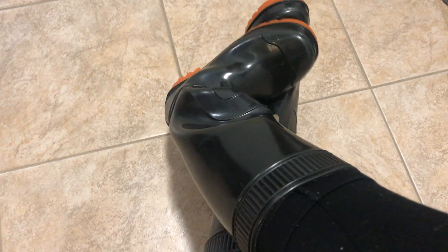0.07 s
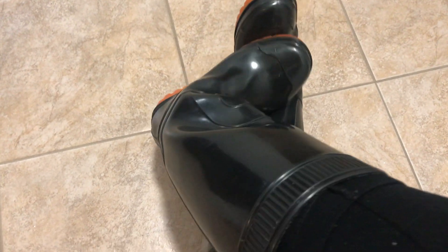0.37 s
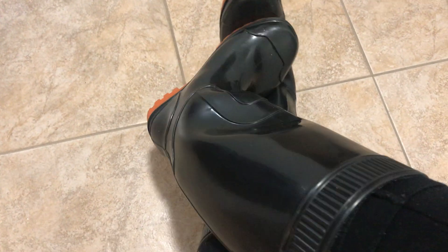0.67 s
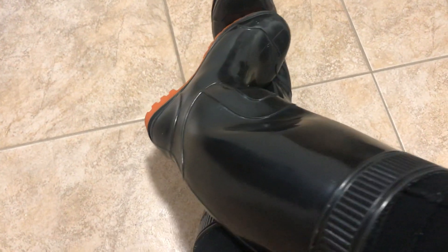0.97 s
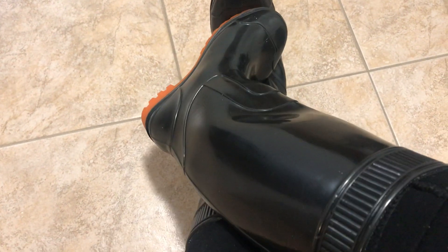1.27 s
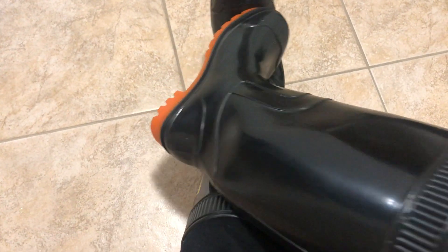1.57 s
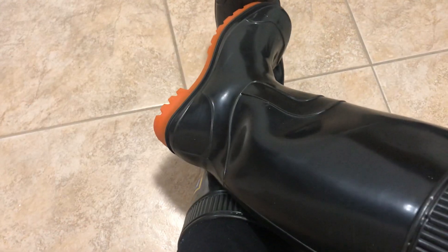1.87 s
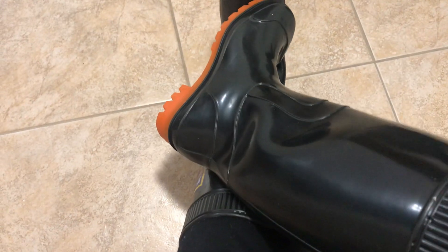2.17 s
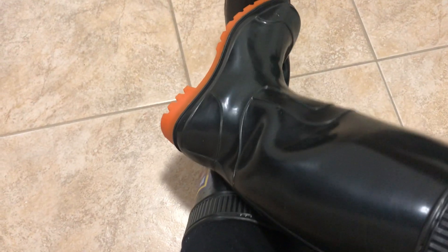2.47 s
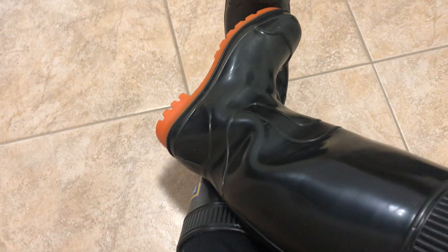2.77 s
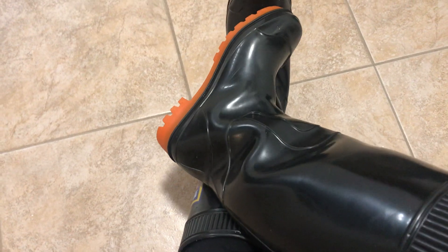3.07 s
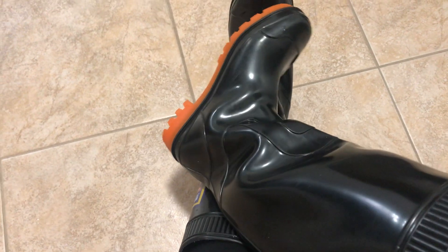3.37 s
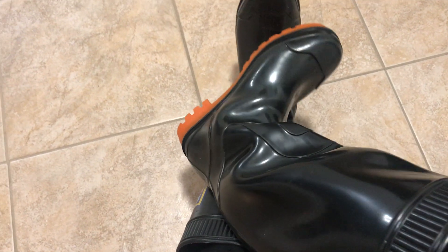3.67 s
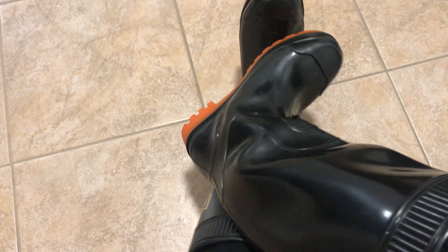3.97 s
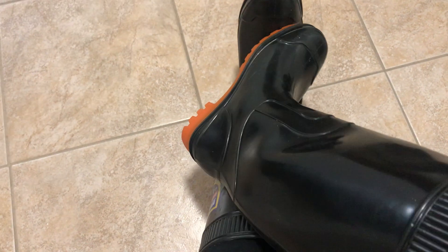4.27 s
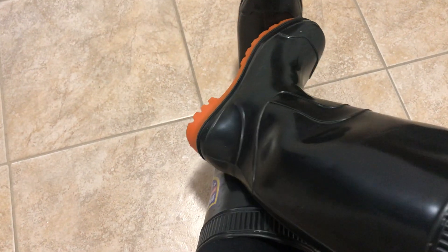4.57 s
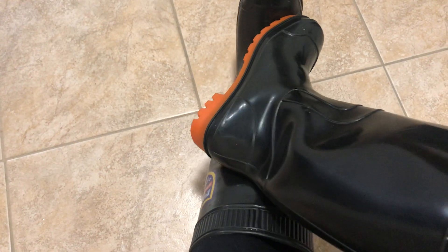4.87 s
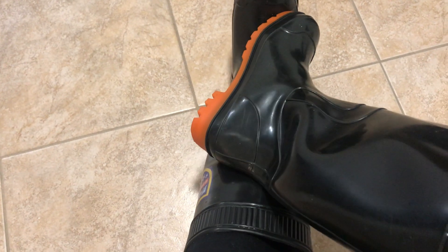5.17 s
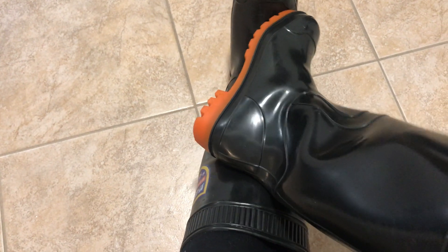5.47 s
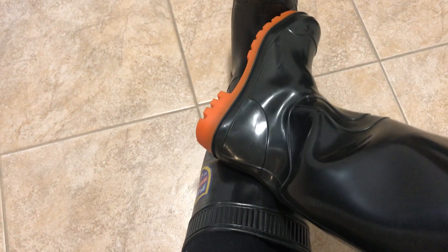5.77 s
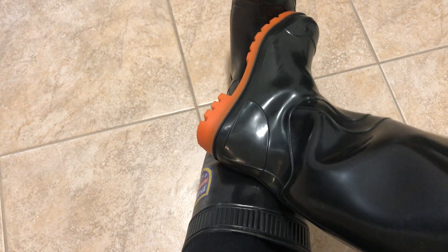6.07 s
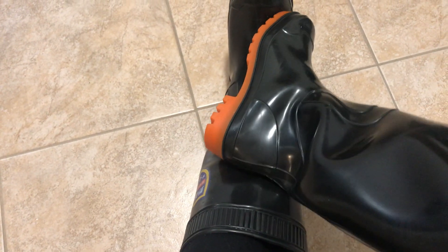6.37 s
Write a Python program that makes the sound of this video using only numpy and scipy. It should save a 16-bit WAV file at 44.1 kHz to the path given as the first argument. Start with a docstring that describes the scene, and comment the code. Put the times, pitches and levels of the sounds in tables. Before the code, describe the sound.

Rubber boots scrape together with a brief hissy creak, then snap and crackle as their folds buckle. One loud pop stands out early on. The rubber goes on sticking and slipping in quieter creaks before the snaps grow stronger, ending in a quick flurry. It is all heard through a single microphone in a small room with a tiled floor, with a short echo and faint steady room tone.

```python
"""A small room with a tiled floor, on one microphone, over a low murmur of air.
A tall rubber boot is flexed at the ankle and rubbed against its partner. The rubber sticks and slips
in creaks, and folds in the shaft buckle with sharp snaps. Each slip gives a crack at the surface,
a flap of the wall and a hollow thump of the shaft, and the room rings briefly behind it.
Once, the whole shaft pops back into shape with a bang."""
import sys
import numpy as np
from scipy import signal
from scipy.fft import rfft, irfft, next_fast_len
from scipy.io import wavfile

SR = 44100
rng = np.random.default_rng(int(sys.argv[2]) if len(sys.argv) > 2 else 0)


def wav_out(sig):
    """Save sig, one row per channel (or a flat mono array), as 16-bit PCM at SR to the path in sys.argv[1]."""
    wavfile.write(sys.argv[1], SR, np.round(np.clip(np.atleast_2d(sig).T, -1, 1) * 32767).astype(np.int16))


N = 292383
TIME = np.arange(N) / SR
AGE = np.arange(SR // 10) / SR   # seconds since a slip

# Folds letting go. Each row: time in seconds, crack, flap and thump in relative dB, crack cutoff in Hz.
FOLD_SNAPS = [(0.03, -54, -43, -44, 6500), (0.1704, -37.5, -36, -33, 4800), (0.3075, -53.5, -70, -65, 6500),
              (0.4035, -58.5, -51, -50, 6040), (0.8167, -45.5, -46.5, -54.5, 3400),
              (0.918, -44, -46.5, -39, 4540), (1.049, -56.5, -54, -54.5, 6000),
              (1.2334, -54.5, -52, -50, 6300), (1.412, -31.5, -36, -42, 4070),
              (1.633, -51.5, -46, -49, 3400), (1.914, -58, -53.5, -57.5, 4000),
              (2.1775, -50, -47.5, -51.5, 6160), (2.435, -46, -45.5, -41.5, 4150),
              (2.4911, -47.5, -42.5, -44.5, 6300), (2.5176, -48, -45.5, -49.5, 6100),
              (2.6014, -50.5, -45.5, -54, 6130), (2.6154, -50, -61, -43, 6300),
              (3.261, -55.5, -60, -62, 4200), (3.329, -59, -53, -65.5, 3300), (3.39, -50, -57, -63, 4200),
              (3.4806, -54.5, -52, -63, 3500), (3.9581, -61, -62, -65, 8800),
              (4.163, -55.5, -65, -68, 7200), (4.252, -57, -46.5, -50.5, 4400),
              (4.3854, -45.5, -41, -38, 4100), (4.506, -44.5, -38.5, -34.5, 4000),
              (4.5442, -42, -38.5, -41, 3260), (4.802, -41, -36.5, -36, 3760),
              (4.9487, -57, -50, -57, 4430), (5.0576, -51.5, -46.5, -52, 4700),
              (5.1019, -43, -35.5, -34.5, 5570), (5.2335, -57, -51, -53, 5300),
              (5.3628, -41.5, -35.5, -34.5, 5240), (6.069, -60, -62, -65, 10100),
              (6.1036, -46, -44, -49.5, 5730), (6.1784, -38.5, -36.5, -33, 6400),
              (6.2768, -39.5, -36.5, -36, 6900), (6.3433, -41.5, -38, -32, 7240),
              (6.3598, -47, -39, -46, 4950), (6.3804, -45.5, -41, -41, 7600),
              (6.556, -47.5, -58, -62, 5500), (6.577, -35.5, -29.5, -35, 5340)]
# Rubbing strokes. Each row: start, hardest push and end in seconds, slips per second at that push,
# unevenness of pace from 0 to 1, crack, flap and thump in relative dB, crack cutoff in Hz.
RUB_STROKES = [(0, 0.001, 0.082, 770, .6, -43, -46.5, -47.5, 6500),
               (0.423, 0.461, .69, 256, .7, -51.5, -52, -48.5, 6500),
               (0.696, 0.769, .91, 95, 0.71, -56, -57, -54.5, 6040),
               (0.918, .94, 0.96, 250, .6, -50, -44, -47.5, 5900),
               (1.561, 1.62, 1.857, 100.5, 0.61, -58, -58.5, -56.5, 5800),
               (2.665, 2.69, 2.762, 178, 0.41, -51, -52.5, -46, 5870),
               (2.891, 2.992, 3.18, 90, 0.19, -62.5, -58.5, -52, 4300),
               (3.17, 3.419, 3.6, 78, 0.84, -57, -61, -64.5, 3460),
               (3.679, 3.776, 3.96, 130, 0.58, -56.5, -56, -59.5, 6300),
               (4.16, 4.27, 4.37, 160, 0.68, -60, -61, -61, 6000),
               (4.55, 4.575, 4.57, 225, .3, -47, -40.5, -43, 4600),
               (4.631, 4.772, 4.84, 69, 0.59, -57.5, -54, -56.5, 5360),
               (5.487, 5.501, 5.53, 230, .7, -58.5, -63, -69, 5500),
               (5.81, 5.89, 5.92, 116, 0.52, -50, -53, -48.5, 5540),
               (6.535, 6.541, 6.572, 127, .6, -66, -47.5, -52, 5400)]
# Modes of the hollow shaft. Each row: frequency in Hz, relative level in dB, t60 in seconds.
SHAFT_MODES = [(84.4, -6.5, 0.13), (118, -2.5, 0.042), (191.4, -2, 0.043), (273.7, -1.5, 0.051),
               (367, -1.5, 0.013), (588, -19.5, 0.16), (925, -14.5, .045)]
# Spectra of a surface crack, free sliding, the shuddering wall and the room's air.
# Each row: frequency in Hz, relative spectral density in dB.
CRACK_SPECTRUM = [(600, -23), (1200, 2), (2300, -0.5), (4200, -1.5), (6500, -4.5), (8000, -3), (10300, -4),
                  (12000, 2.5), (16000, -0.5)]
SLIDE_SPECTRUM = [(3000, -15), (5700, -19), (6400, 10), (8300, 1), (10000, -22), (16000, -16)]
SHUDDER_SPECTRUM = [(80, 4), (350, 5), (1500, -2.5), (2400, -1), (6800, -3), (8000, -28)]
AIR_SPECTRUM = [(25, -13), (45, 2.5), (85, -2), (140, -5), (245, -11.5), (295, 1.5), (370, -16.5),
                (900, -13.5), (2000, -25.5), (4000, -31.5), (9000, -38.5)]
# How long the room rings. Each row: frequency in Hz, t60 in seconds.
RING_T60 = [(100, 0.5), (300, 0.54), (4000, 0.57), (14000, 0.41)]
# How much room reaches the microphone. Each row: frequency in Hz, level in dB against the direct sound.
RING_DB = [(80, -8.5), (280, -6), (600, -6.5), (1300, -4), (4000, -6), (14000, -7)]

FLAP_HZ, FLAP_FALL = 701, 0.91   # centre pitch of a flap; octaves it glides on either side of its centre
LIGHT_DB, HEAVY_DB = -47, -32   # thump levels that mark a fold as light or heavy
WARNING_S, WARNING_DB = .012, -11   # a small slip just before a fold gives way
SETTLING_S, SETTLING_DB = .017, -12.5   # and another as it settles
# A sticking patch judders free in four even, light snaps; levels are for crack, flap and thump.
JUDDER_S, JUDDER_GAP_S, JUDDER_DB, JUDDER_CUTOFF_HZ = .0732, .0243, (-49.5, -40, -46.5), 6100


def from_db(db):
    """Decibels to gain."""
    return 10 ** (np.asarray(db) / 20)


def unit(x):
    """Scale to an energy of one."""
    return x / np.sqrt(np.sum(x ** 2) + 1e-20)


def at_hz(points, hz):
    """Read a table on a log-frequency axis."""
    f, value = np.transpose(points)
    return np.interp(np.log(hz + 1e-6), np.log(f), value)


def add(out, s, sound):
    """Mix a sound in at s seconds."""
    i = max(0, int(s * SR))
    out[i:i + len(sound)] += sound[:max(0, N - i)]


def filtered(x, kind, hz, order=2):
    """Butterworth low-, high- or band-pass."""
    return signal.sosfilt(signal.butter(order, hz, kind, fs=SR, output="sos"), x)


def colour(x, spectrum):
    """Causal (minimum-phase) filter with the given spectrum."""
    size = 2 * next_fast_len(len(x))
    hz = np.arange(size // 2 + 1) * SR / size
    cepstrum = irfft(np.log(from_db(at_hz(spectrum, hz))))
    cepstrum[1:size // 2] *= 2
    cepstrum[size // 2 + 1:] = 0
    return irfft(rfft(x, size) * np.exp(rfft(cepstrum)), size)[:len(x)]


def steady_noise(spectrum):
    """Coloured noise with an RMS of one."""
    return np.sqrt(N) * unit(colour(rng.standard_normal(N), spectrum))


def air(level_db):
    """Room tone: the steady low murmur of the air."""
    return from_db(level_db) * steady_noise(AIR_SPECTRUM)


def room_response(floor_lag_s, floor_db, near_db, near_t60):
    """An echo off the tiles, quick ones off legs and near walls, then a ring, shorter in the treble."""
    t = TIME[:SR * 3 // 4]
    edges = np.geomspace(50, 18000, 13)
    response = np.zeros(len(t))
    for low, high in zip(edges, edges[1:]):
        hz = np.sqrt(low * high)
        band = filtered(rng.standard_normal(len(t)), "band", [low, high])
        decay = from_db(-60 * t / at_hz(RING_T60, hz)) + from_db(near_db - 60 * t / near_t60)
        tail = unit(band * decay * (1 - np.exp(-t / floor_lag_s)))
        response += tail * from_db(at_hz(RING_DB, hz)) * np.sqrt(2 * (high - low) / SR)
    response[int(floor_lag_s * SR)] += from_db(floor_db)
    return response


def room(direct):
    """The moving boot reaches the microphone directly and by ever changing paths through the room."""
    heard = direct.copy()
    for share in np.cos(2 * np.pi * TIME), np.sin(2 * np.pi * TIME):
        response = room_response(floor_lag_s=.0042, floor_db=-20.5, near_db=3.5, near_t60=0.084)
        heard += signal.fftconvolve(share * direct, response)[:N]
    return heard


def bump(s, level_db, hz, width_s):
    """A soft, deep bump as the leg shifts."""
    return from_db(level_db) * np.exp(-((TIME - s) / width_s) ** 2) * np.sin(2 * np.pi * hz * TIME)


def slide(level_db, end_s, fade_s):
    """In the first, fastest stroke the rubber slides freely and hisses."""
    return from_db(level_db) * steady_noise(SLIDE_SPECTRUM) * np.clip((end_s - TIME) / fade_s, 0, 1)


def shudder(s, bang_db, body_db, body_t60, body_cutoff_hz, treble_db, treble_t60):
    """The shaft pops back into shape with one sharp bang, and all of its wall shudders."""
    t = TIME[:SR // 2]
    body, treble = rng.standard_normal((2, len(t)))
    body = filtered(body, "low", body_cutoff_hz)
    # rubber soaks up the treble sooner than the bass
    push = from_db(body_db) * unit(body * from_db(-60 * t / body_t60))
    push += from_db(treble_db) * unit(treble * from_db(-60 * t / treble_t60))
    push[0] -= from_db(bang_db)
    out = np.zeros(N)
    add(out, s, colour(push, SHUDDER_SPECTRUM))
    return out


def thump(stretch):
    """The shaft's modes: the rubber's bend shifts their pitch, the place of the slip their strengths."""
    hz, db, t60 = np.transpose(SHAFT_MODES)[:, :, None]
    bend, place = rng.uniform(-1, 1, (2, len(SHAFT_MODES), 1))
    gain = from_db(db + 2 * place - 60 * AGE / t60)
    modes = np.sum(gain * np.sin(2 * np.pi * hz * (1 + stretch * bend) * AGE), axis=0)
    return unit(filtered(modes, "high", hz.min()))   # little radiates below the lowest mode


def flap(hz, cycles):
    """The limp wall swings for a few cycles, falling in pitch as the fold opens."""
    hz = hz * 2 ** (rng.uniform(-1, 1) / 3)
    progress = AGE * hz / cycles
    pitch = hz * 2 ** (FLAP_FALL * (2 * np.exp(-progress) - 1))
    swing = np.sin(2 * np.pi * (np.cumsum(pitch) / SR + rng.random()))
    return unit(np.sqrt(progress) * np.exp(-2 * progress) * swing)


def crack(cutoff_hz, spread_s, crumble_db, crumble_t60):
    """One release, spread out as bending waves bring the highs first, then a crumble of tiny slips."""
    hz = np.arange(len(AGE) // 2 + 1) * SR / len(AGE)
    lag = spread_s * rng.uniform(0.533, 1) * np.sqrt(FLAP_HZ / (hz + FLAP_HZ))
    release = irfft(np.exp(-2j * np.pi * np.cumsum(lag) * hz[1]), len(AGE))
    grains, sizes = rng.standard_normal((2, len(AGE)))
    crumble = unit(grains * from_db(5.5 * sizes - 60 * AGE / crumble_t60))
    surface = colour(release + from_db(crumble_db) * crumble, CRACK_SPECTRUM)
    return unit(filtered(surface, "low", cutoff_hz))


def creaks(crack_db, flap_db, thump_db, flap_hz, uneven_db, thump_band_hz):
    """Rubber on rubber: tension builds and slips at an uneven pace, each slip a small snap."""
    flaps = [flap(flap_hz, cycles=1.41) for _ in range(24)]
    thumps = [thump(stretch=0.048) for _ in flaps]
    surface, hollow = np.zeros((2, N))
    for start, push, end, pace, jitter, *levels, cutoff_hz in RUB_STROKES:
        cracks = [crack(cutoff_hz, spread_s=0.00172, crumble_db=6, crumble_t60=0.035) for _ in range(12)]
        s = start
        for wait, force, place in rng.uniform(-1, 1, (200, 3)):
            if s > end:
                break
            # effort swells to the hardest push, then eases; the slips come faster with effort
            effort_db = np.interp(s, [start, push, end], [-5, 0, -7])
            period = 1 / (pace * from_db(.5 * effort_db))
            # a longer stick stores more energy
            strength = np.sqrt(period * SR) * from_db(effort_db + uneven_db * force)
            crack_gain, flap_gain, thump_gain = strength * from_db(levels)
            k = int(abs(place) * len(flaps))
            add(surface, s, crack_gain * from_db(crack_db) * cracks[k % len(cracks)])
            add(surface, s, flap_gain * from_db(flap_db) * flaps[k])
            add(hollow, s, thump_gain * from_db(thump_db) * thumps[k])
            s += period * np.exp(jitter * wait)
    return surface + filtered(hollow, "band", thump_band_hz)   # small slips stir only the middle modes


def snaps(crack_db, flap_db, thump_db, wall_db, wall_hz, wall_t60, peel_db, peel_t60, lead_s, lag_s):
    """A fold peels with a swelling crackle, buckles with a crack, and shakes the wall and the shaft."""
    out = np.zeros(N)
    judder = [(JUDDER_S + k * JUDDER_GAP_S, *JUDDER_DB, JUDDER_CUTOFF_HZ) for k in range(4)]
    wall_ring = unit(np.sin(2 * np.pi * wall_hz * AGE) * from_db(-60 * AGE / wall_t60))
    for s, crack_level, flap_level, thump_level, cutoff_hz in FOLD_SNAPS + judder:
        crack_gain, flap_gain = from_db(crack_level + crack_db), from_db(flap_level + flap_db)
        # a large fold thumps more and flaps lower
        flap_hz = FLAP_HZ * 2 ** np.clip((flap_level - thump_level) / 25, -.3, .5)
        buckle = crack(cutoff_hz, spread_s=0.00197, crumble_db=-1.5, crumble_t60=0.026)
        add(out, s - lead_s, crack_gain * buckle + flap_gain * flap(flap_hz, cycles=2.03))
        # the heavier the fold, the more the taut wall rings and the deeper the modes it stirs
        weight = np.interp(thump_level, [LIGHT_DB, HEAVY_DB], [0, 1])
        add(out, s, weight * from_db(flap_level + wall_db) * wall_ring)
        low_cut_hz = np.interp(weight, [0, 1], [185, 69])
        hollow = unit(filtered(thump(stretch=0.076), "high", low_cut_hz))
        add(out, s + lag_s, -from_db(thump_level + thump_db) * hollow)
        # light folds peel and slip more quietly
        slip_db = -7 * (1 - weight)
        peel = crack(cutoff_hz, spread_s=0, crumble_db=27, crumble_t60=peel_t60)[:SR // 50][::-1]
        add(out, s - len(peel) / SR, from_db(crack_level + peel_db + slip_db) * peel)
        early, late = rng.uniform(.7, 1.3, 2)
        for at, db in (s - early * WARNING_S, WARNING_DB), (s + late * SETTLING_S, SETTLING_DB):
            scuff = crack_gain * crack(cutoff_hz, spread_s=0.00167, crumble_db=1, crumble_t60=0.04)
            scuff += flap_gain * flap(flap_hz, cycles=3.06)
            add(out, at, from_db(db + slip_db) * scuff)
    return out


def scene():
    """The boot's snaps and creaks in the tiled room, as they arrive at the microphone."""
    boot = snaps(crack_db=26.5, flap_db=25, thump_db=26.5, wall_db=25, wall_hz=620, wall_t60=0.072,
                 peel_db=19, peel_t60=0.034, lead_s=.0005, lag_s=.0012)
    boot += creaks(crack_db=-2, flap_db=-.5, thump_db=3.5, flap_hz=960, uneven_db=4,
                   thump_band_hz=[191, 600])
    boot += slide(level_db=-56, end_s=0.093, fade_s=.012)
    boot += bump(s=0.302, level_db=-45.5, hz=45, width_s=0.042)
    # the shudder spreads over the whole wall, so it sounds diffuse by itself
    pop = shudder(s=1.4115, bang_db=0.5, body_db=-5, body_t60=0.42, body_cutoff_hz=1780,
                  treble_db=-15, treble_t60=0.21)
    return (room(boot) + pop + air(level_db=-57.5))[None]


def record(dry):
    """The microphone drops the deepest bass; the top is cut steeply."""
    top_cut = signal.ellip(10, .2, 70, 16200, fs=SR, output="sos")
    return signal.sosfilt(top_cut, filtered(dry, "high", hz=38, order=4))


dry = scene()
out = record(dry)
wav_out(out)
```